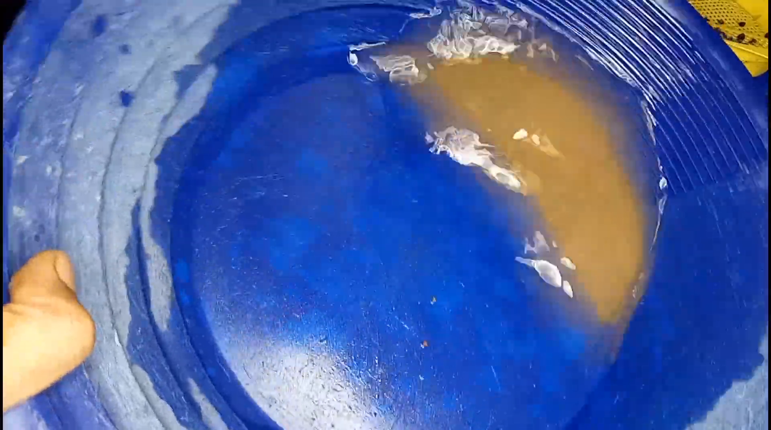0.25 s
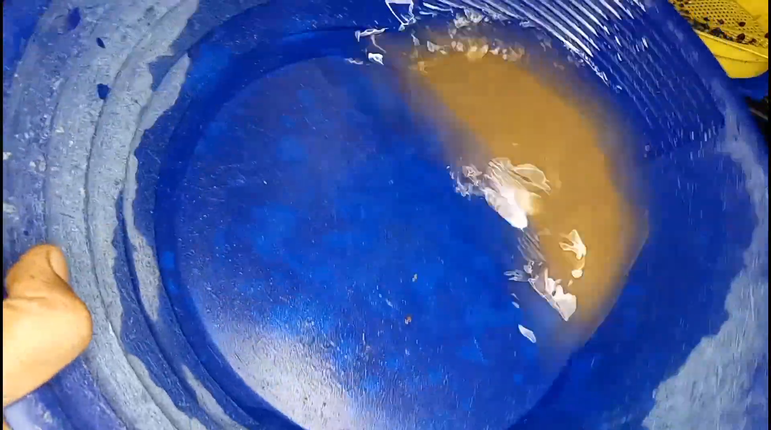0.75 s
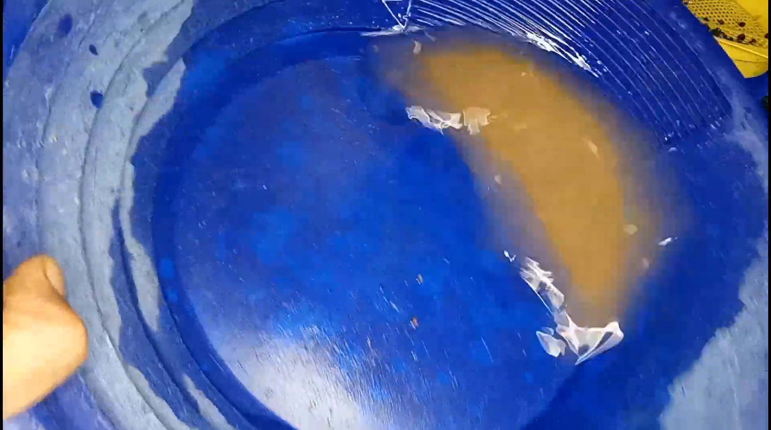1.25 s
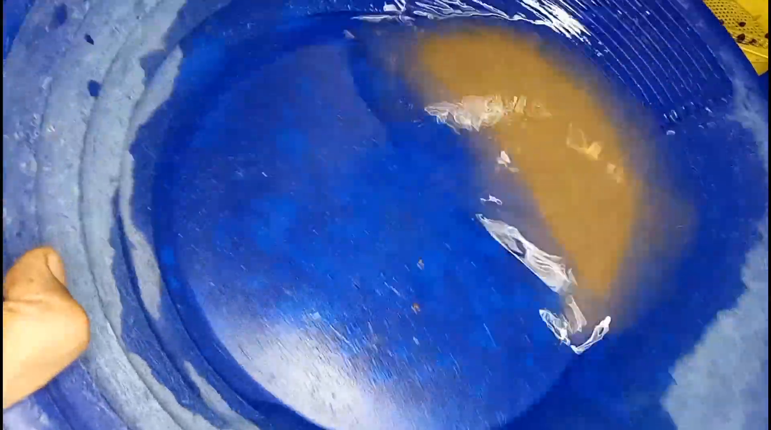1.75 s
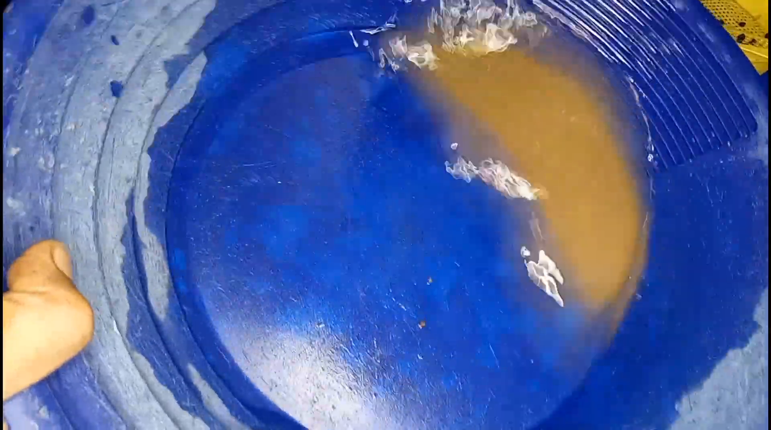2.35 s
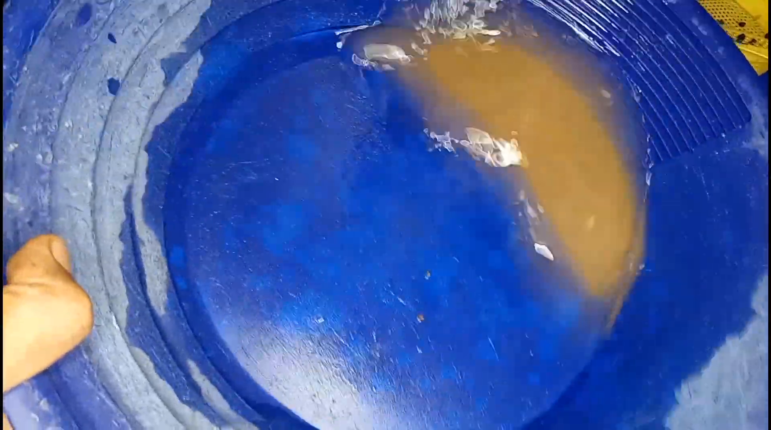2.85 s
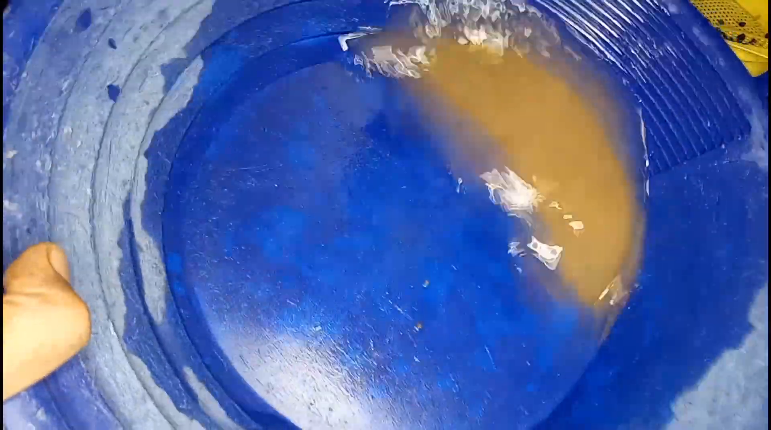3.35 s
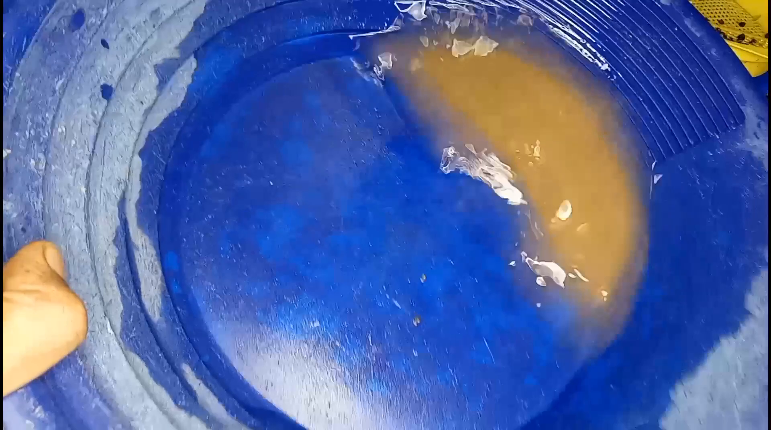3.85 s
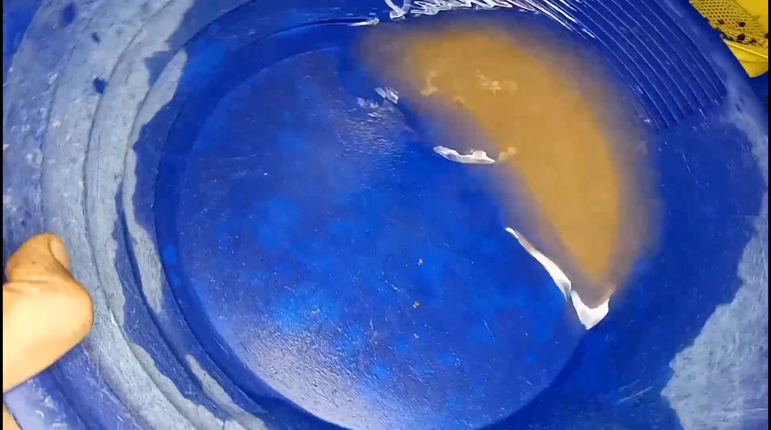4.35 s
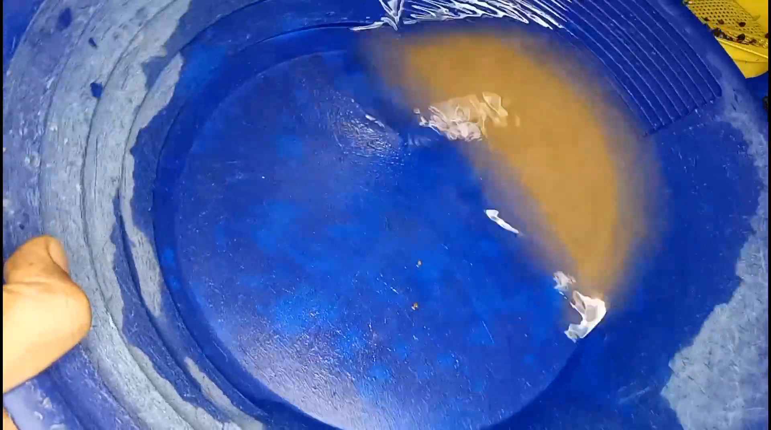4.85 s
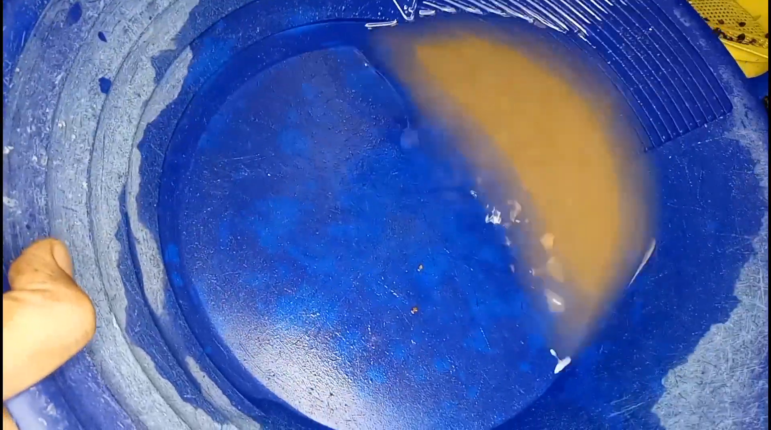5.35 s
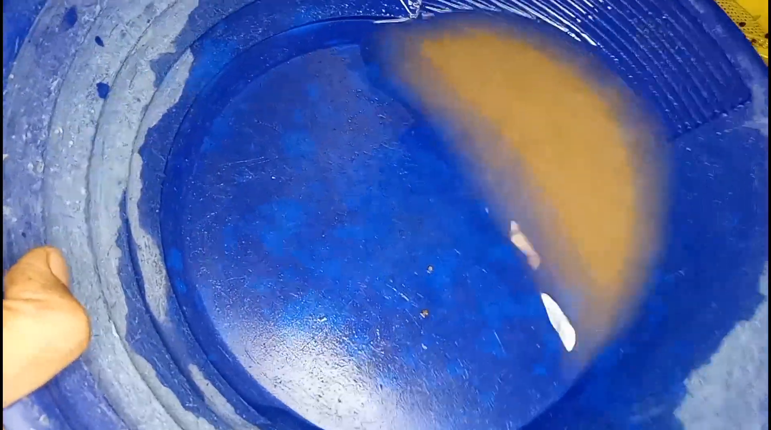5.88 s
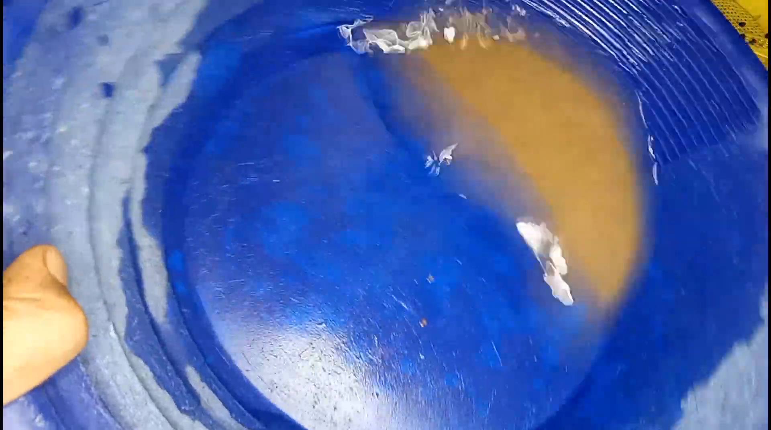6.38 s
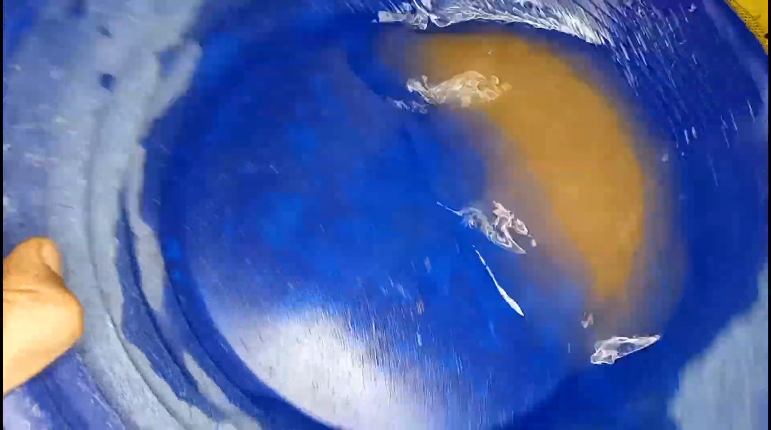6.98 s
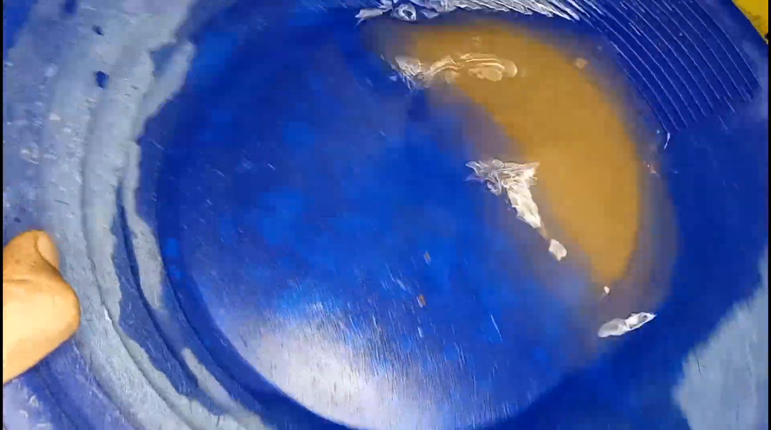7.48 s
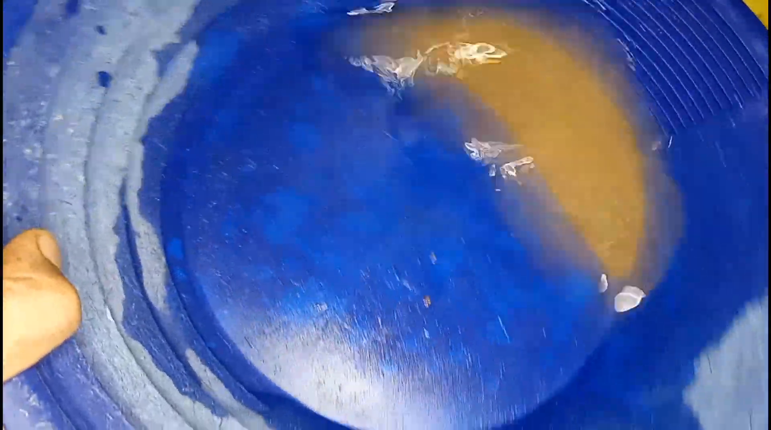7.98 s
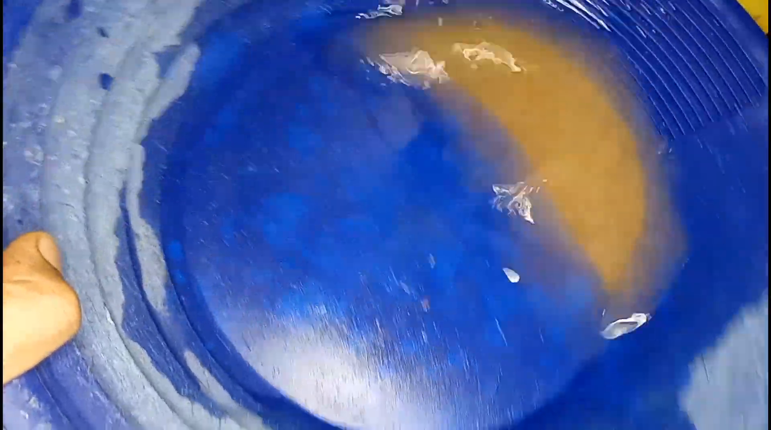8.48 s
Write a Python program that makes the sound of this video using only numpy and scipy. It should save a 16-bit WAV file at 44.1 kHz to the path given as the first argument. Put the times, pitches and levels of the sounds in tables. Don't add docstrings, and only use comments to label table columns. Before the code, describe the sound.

A plastic pan of water and sand is shaken by hand, very close. Hard grit cracks and wet slaps ring the wall dully, each with a dry tick, thin sizzle and short wash of sand. Activity is dense at first, eases after four seconds to light taps and tiny bubble pops, then returns strongly near seven seconds. Quiet small furnished room, faint mains hum, stereo phone microphone.

```python
import sys
import numpy as np
from scipy import signal
from scipy.fft import rfft, irfft
from scipy.io import wavfile
from scipy.ndimage import uniform_filter1d

SR = 44100
rng = np.random.default_rng(int(sys.argv[2]) if len(sys.argv) > 2 else 0)


def transcribe(u):
    v = np.clip(np.atleast_2d(u).T, -1, 1)
    q = np.round(v * 32767).astype(np.int16)
    wavfile.write(sys.argv[1], SR, q)


def volts(x):
    e = np.asarray(x, float) / 20
    return 10 ** e


N = 384552

# start in seconds, peak in dB, pitch in Hz, fade in seconds.
BUBBLES = [(5.476, -59, 2530, .035), (5.708, -51.5, 3900, .008), (5.77, -53.5, 3950, 0.026),
           (5.775, -53, 4850, 0.0098), (5.8371, -63, 1920, 0.027), (5.845, -66, 4600, 0.022),
           (5.998, -59, 4300, 0.019), (6.02, -62, 3750, .02), (6.035, -63.5, 3150, 0.014),
           (6.135, -53.5, 5440, 0.022), (4.7, -53, 4600, .02), (4.318, -53, 3900, 0.011),
           (8.322, -30.5, 7200, 0.0018), (6.298, -61, 4500, .015)]
# frequency in Hz, width in Hz, level in dB.
PAN_MODES = [(129, 14, -4), (204, 12.5, 5), (305, 5.3, -2), (383, 50, -2.5), (420, 160, -13.5),
             (590, 26.4, -1), (730, 19, -2.5), (897.2, 25.6, 6), (990, 101, -2.5), (1350, 73, 2),
             (1790, 100, -2), (2018, 52, -2.5)]
# frequency in Hz, width in Hz, level in dB.
TICK_MODES = [(2400, 1200, 4.5), (2857, 150, 2.5), (3305, 130, 7.5), (3945, 120, 4.5), (4375, 310, 5.5),
              (5530, 510, 4.5), (6660, 490, -8.5), (6760, 280, -10.5)]
# frequency in Hz, width in Hz, level in dB.
SIZZLE_MODES = [(6600, 1000, -3), (9700, 83, -17.5), (10430, 380, -11.5), (11500, 580, -14.5),
                (14840, 250, -14.5), (15100, 3000, -2)]
# frequency in Hz, level in dB.
HUM = [(60, -81.5), (120, -73.5), (360.7, -80.5), (538.3, -80), (662.1, -74.5), (780.6, -76.5),
       (839.8, -75)]
# frequency in Hz, density in dB per Hz.
AIR_COLOUR = [(25, -27), (60, -16), (130, -14), (175, -20.5), (427, -20), (796, -18.5), (3820, -35),
              (16000, -42)]
# time in seconds, left minus right in dB.
PAN_PLACE = [
    (0, -1),
    (4.35, -1),
    (4.55, -5),
    (5.4, -5),
    (5.6, -.8),
]
# start in seconds, peak in dB, loudest pan tone in Hz, tick in dB.
CRACKS = [(0.05, -28, 960, -40), (0.562, -16, 790, -13.5), (0.819, -25, 890, -35),
          (1.733, -25.5, 1020, -36), (1.863, -12, 684, -29), (2.22, -26.5, 1060, -26.5),
          (2.414, -15.5, 960, -22.5), (2.434, -19, 820, -37), (2.831, -15, 1270, -18.5),
          (2.909, -19, 1130, -19), (3.33, -8, 802, -10), (3.351, -14, 1080, -16.5), (3.452, -35, 910, -34),
          (3.651, -24.5, 580, -44), (3.678, -21.5, 1820, -28), (4.075, -34, 910, -35),
          (4.194, -39.5, 880, -35.5), (5.101, -27, 1860, -30.5), (6.924, -17, 460, -31),
          (6.937, -25, 270, -41), (7.176, -28.5, 1210, -31.5), (7.34, -16, 1110, -17),
          (7.409, -15, 970, -49), (7.551, -24, 730, -50), (7.801, -36, 800, -35.5), (7.94, -14, 694, -12),
          (8.027, -12.5, 1290, -21.5), (8.071, -36, 910, -31.5), (8.468, -11, 1190, -13),
          (8.713, -12.5, 960, -11.5)]
# start in seconds, peak in dB, loudest pan tone in Hz, tick in dB.
SLAPS = [(0.272, -17, 500, -42), (0.511, -13.5, 730, -29.5), (0.525, -19.5, 890, -58),
         (0.74, -20.5, 865, -36.5), (0.757, -15, 875, -29), (0.802, -22, 810, -37.5),
         (1.615, -27.5, 590, -46), (1.745, -25.5, 990, -38), (1.874, -12.5, 905, -21.5),
         (1.9, -14, 700, -25), (1.906, -23, 680, -27), (2.083, -19.5, 900, -34), (2.09, -11.5, 554, -29),
         (2.34, -10, 606, -20), (2.543, -31, 2080, -38.5), (2.734, -27, 2090, -41),
         (2.851, -12.5, 740, -22.5), (2.87, -23, 980, -54), (3.208, -20.5, 1055, -32),
         (5.137, -32.5, 1350, -38.5), (6.817, -22, 1047, -31.5), (6.95, -28, 786, -29),
         (7.11, -24, 990, -33), (7.121, -18, 1090, -36), (7.202, -14, 760, -22.5), (7.395, -19, 603, -30),
         (7.432, -13, 616, -35), (7.68, -15.5, 630, -34.5), (7.926, -17.5, 570, -52),
         (7.991, -24.5, 218, -39)]
# start in seconds, peak in dB, loudest pan tone in Hz, tick in dB.
SLOSHES = [(0.02, -44, 830, -58), (0.655, -25, 1250, -31), (0.834, -26.5, 890, -45), (0.895, -35, 820, -61),
           (1.479, -34, 1540, -46), (1.526, -47, 1100, -44), (1.89, -50, 730, -35.5),
           (2.007, -25, 1110, -39.5), (2.38, -25, 342, -36), (2.482, -23, 960, -39.5),
           (2.597, -33.5, 342, -50), (2.959, -28.5, 880, -47), (3.131, -35.5, 950, -36),
           (3.529, -31, 1430, -40), (3.638, -27, 406, -43), (3.663, -30.5, 302, -35.5),
           (3.797, -42, 920, -38), (3.808, -39, 940, -37), (3.906, -17.5, 684, -29),
           (4.761, -40.5, 2050, -49), (4.872, -46, 1340, -48.5), (5.072, -32, 1900, -50.5),
           (6.191, -42.5, 336, -94), (6.581, -38.5, 414, -47), (6.635, -45, 300, -54),
           (6.871, -55, 940, -39), (6.979, -22.5, 700, -36), (7.453, -31, 930, -29),
           (7.634, -31, 1350, -46.5), (7.735, -31.5, 930, -42)]
# start in seconds, peak in dB, loudest pan tone in Hz, tick in dB.
LAPS = [(0.063, -36, 1880, -27.5), (0.168, -33, 1410, -44), (0.327, -32.5, 710, -55),
        (0.431, -62, 1370, -46), (1.305, -47.5, 624, -62), (1.388, -38.5, 1830, -52.5),
        (1.673, -35, 590, -42.5), (2.619, -34.5, 380, -47), (2.644, -36, 360, -38.5),
        (3.027, -41, 1440, -43), (3.047, -48, 1410, -49), (3.256, -43, 1350, -43), (3.27, -30, 980, -52),
        (4.265, -42, 1750, -51), (4.63, -32.5, 1640, -48), (4.668, -42.5, 1370, -49),
        (4.836, -35.5, 1560, -44), (6.157, -48, 1300, -60.5), (6.323, -30.5, 1390, -52),
        (6.356, -44, 536, -49), (6.616, -32.5, 1410, -47), (6.652, -28, 1420, -41), (6.787, -30, 1360, -46),
        (8.232, -48, 410, -47), (8.324, -40, 1370, -37)]
# start in seconds, peak in dB, tick in dB.
TAPS = [(0.494, -41, -43), (0.996, -38.5, -48), (1.323, -41, -49), (1.512, -50, -38), (1.825, -33.5, -42),
        (2.263, -60, -69), (2.551, -34, -31.5), (2.8, -37, -45), (3.521, -33.5, -42.5),
        (3.54, -34.5, -41.5), (3.892, -35, -35.5), (4.279, -43, -48.5), (4.352, -40, -51),
        (4.445, -38, -54), (4.455, -36.5, -50), (4.62, -45, -47.5), (4.699, -44.5, -49), (4.903, -37, -51),
        (4.972, -39.5, -53), (5.581, -55, -61.5), (5.604, -49.5, -59.5), (6.458, -39.5, -54),
        (6.762, -37.5, -49), (6.999, -27.5, -68), (7.01, -22.5, -68), (7.03, -33, -50), (7.556, -39, -41.5),
        (8.182, -58, -43.5), (8.591, -34, -47.5), (8.68, -41, -35)]
# start in seconds, peak in dB.
SPRAYS = [(0.05, -18), (0.655, -25), (1.512, -25.5), (1.745, -19.5), (1.89, -26.5), (1.906, -17.5),
          (2.083, -15), (2.87, -20.5), (3.351, -16), (3.678, -24), (3.797, -19.5), (3.808, -26),
          (3.906, -19), (4.075, -18), (5.137, -29.5), (6.817, -18), (7.11, -18.5), (7.202, -22),
          (7.34, -18), (7.409, -10), (7.453, -18.5), (7.801, -21), (8.071, -21.5), (8.591, -23),
          (0.02, -30), (0.168, -30), (0.273, -32.5), (0.431, -33.5), (0.819, -29.5), (0.997, -27.5),
        (1.305, -33.5), (2.22, -27), (2.342, -32), (2.414, -28.5), (2.734, -36), (2.851, -28), (0.757, -34),
        (0.895, -45), (1.824, -33), (2.263, -35), (2.543, -33), (3.027, -41), (4.278, -40), (6.157, -42.5),
        (7.395, -32), (7.634, -40), (3.131, -32), (3.208, -28), (3.518, -31), (3.539, -31), (3.893, -46),
        (4.194, -38), (4.265, -31), (4.445, -31), (4.668, -28), (4.872, -34), (5.601, -38.5), (6.356, -35),
        (6.581, -31), (6.95, -28), (7.558, -30.5), (8.027, -24), (8.183, -32), (8.682, -27)]
# time in seconds, rolling sand in dB.
SHAKE = [(0.0, -33.5), (0.16, -64), (0.72, -41.5), (0.97, -77), (1.31, -65), (1.7, -46.5), (2.1, -51),
         (2.48, -49.5), (3.62, -53), (3.84, -49), (4.13, -55), (4.69, -74.5), (4.85, -56.5), (5.08, -57),
         (5.3, -66), (5.95, -85), (6.62, -46.5), (8.72, -52)]
# start in seconds, peak in dB, loudest pan tone in Hz, tick in dB.
RIPPLES = [(0.129, -38.5, 620, -48.5), (0.247, -33, 560, -53), (0.372, -43.5, 396, -79),
           (0.574, -22.5, 605, -43), (0.667, -47, 870, -54), (0.874, -42, 910, -89),
           (1.556, -36.5, 870, -52), (1.761, -50, 584, -57), (1.944, -31, 371, -61), (1.963, -37, 366, -58),
           (2.145, -53, 606, -42.5), (2.245, -34, 921, -60), (2.364, -22, 560, -39), (2.443, -23, 740, -36),
           (2.938, -26, 890, -59), (2.977, -33, 923, -47), (3.361, -32, 920, -29), (3.462, -29.5, 870, -46),
           (3.709, -38, 598, -63), (3.731, -43, 1370, -60), (3.941, -31, 595, -45), (3.98, -38, 306, -54),
           (4.056, -68, 937, -76), (4.088, -37.5, 896, -46), (4.392, -50, 1350, -62),
           (4.739, -40, 385, -54), (4.925, -45, 846, -72), (4.994, -46, 864, -50), (5.061, -43, 1050, -68),
           (5.144, -32, 1380, -50.5), (6.73, -50.5, 934, -73.5), (6.892, -32.5, 940, -48),
           (6.957, -28, 674, -52), (7.049, -32.5, 950, -53), (7.086, -30, 937, -47), (7.27, -77, 1170, -79),
           (7.271, -31.5, 930, -58), (7.31, -34, 918, -55), (7.379, -24.5, 1010, -44),
           (7.537, -35.5, 744, -63), (7.759, -32, 905, -69), (7.849, -39, 910, -73),
           (7.894, -30.5, 930, -62), (7.97, -35, 985, -61), (8.153, -61, 900, -72), (8.365, -44, 915, -58),
           (8.419, -40.5, 920, -43), (8.526, -36, 923, -59), (8.654, -37.5, 929, -47),
           (8.694, -32.5, 940, -42)]
# start in seconds, tick in dB, fizz in dB.
PRICKS = [(0.2144, -47, -48), (1.58, -36, -64), (2.043, -43, -46), (2.5217, -55, -61), (2.69, -47, -71),
          (2.7806, -71, -50), (3.073, -39, -54), (3.1717, -35, -63), (3.5923, -37.5, -72),
          (3.765, -55, -44.5), (3.8302, -29.5, -57), (4.6847, -49, -62), (6.531, -41.5, -81),
          (6.8844, -52, -62), (7.502, -35.5, -45), (7.5724, -56, -43), (7.649, -34, -69),
          (7.7004, -47, -47), (7.9086, -38, -54), (8.111, -59, -68), (8.5425, -60, -78), (8.578, -45, -66)]
# start in seconds, length in seconds, level in dB, pitch in Hz.
SLIDES = [(0.25, 0.066, -63, 4500), (3.362, 0.022, -56, 8800), (3.656, 0.035, -46, 6200),
          (3.793, 0.037, -52, 8500), (3.801, 0.088, -55.5, 6160), (3.898, 0.023, -45, 9350),
          (4.965, 0.05, -67, 4600), (4.485, 0.039, -66, 1900), (6.87, 0.054, -62, 3800),
          (3.797, 0.06, -54, 15400), (4.75, 0.028, -65, 2200), (8.26, 0.061, -60, 1120),
          (3.89, 0.036, -47, 14700), (8.497, 0.074, -61, 3350), (8.645, 0.056, -64, 6300)]
# start in seconds, peak in dB, loudest pan tone in
# Hz, tick in dB.
MORE_RIPPLES = [(0.003, -23.5, 900, -39), (0.433, -49.5, 1110, -51), (0.478, -44, 890, -58),
                (0.67, -30.5, 900, -50), (0.974, -52, 890, -63), (2.305, -34, 800, -58),
                (2.693, -38.5, 1820, -62), (3.188, -35, 900, -61), (4.002, -52.5, 900, -60),
                (5.213, -55, 1350, -52.5), (5.243, -47, 1430, -56), (5.509, -51.5, 950, -78),
                (6.444, -42, 930, -60.5), (7.26, -38, 930, -53.5), (8.062, -33, 920, -57),
                (8.115, -38, 1010, -55), (8.135, -38, 930, -74)]

PORTS = np.array([[1], [-1]])
ALIKE_HZ = 1280
WALL_HZ = 905
LEAD_S = .015
FLICKER_TOP = 1.1


def seconds(count):
    return np.arange(count) / SR


def unit(x):
    return x / np.sqrt(np.mean(x ** 2) + 1e-30)


def walk(rate):
    hold = int(SR / rate)
    steps = np.repeat(rng.standard_normal(N // hold + 1), hold)
    return 5.0 * uniform_filter1d(steps, hold)[:N]


def air():
    hz = np.arange(N // 2 + 1) * SR / N + 1
    colour_hz, colour_db = np.transpose(AIR_COLOUR)
    colour = volts(np.interp(np.log(hz), np.log(colour_hz), colour_db))
    mid, side = rfft(rng.standard_normal((2, N))) * colour
    noise = irfft(mid + np.clip(hz / ALIKE_HZ + 0.26, 0, 1) * side * PORTS, N)
    hum = 0
    for f, db in HUM:
        level = volts(db - 2.5 + 0.49 * walk(0.53))
        hum = hum + level * np.sin(2 * np.pi * (f * seconds(N) + rng.random()))
    return volts(-72.5) * unit(noise) + hum


def ring(modes, scatter_db, damp, lean_db=0):
    hz, width, db = np.transpose(modes)
    chance = rng.standard_normal((3, len(hz)))
    t = seconds(min(1700, int(2 * SR / width.min() / damp)))[:, None]
    pitch = hz * (1 + 0.028 * np.minimum(2000 / hz, 1) * chance[0])
    tones = np.exp(np.pi * t * (2j * pitch - damp * width))
    apart = np.clip(hz / ALIKE_HZ, .1, 1.3) ** 1.71 * chance[2] * PORTS / 2
    strength = volts(db + lean_db + scatter_db * chance[1]) * width * np.sign(chance[0] * chance[2])
    return ((strength * np.exp(1j * apart)) @ tones.T).imag


def strike(modes, scatter_db, lean_db, rise_s, wash_db, wash_s):
    quench_s, quench_db = 0.0068, -10.5
    t = seconds(4600) - LEAD_S
    noise = rng.standard_normal((3, len(t)))
    after = np.maximum(t, 0)
    soft = min(rise_s / 0.0014, 1)
    push = noise[0] * after / rise_s * np.exp(1 - after / rise_s)
    push[int((LEAD_S + rise_s) * SR)] += 22 * (1 - soft)
    lumps = volts(2.4 * uniform_filter1d(noise[2], size=110) * np.sqrt(110))
    gather = 0.28 * soft * np.exp(t / 0.0097)
    wash = noise[1] * lumps * np.where(t < 0, gather, np.exp(-t / wash_s))

    struck = ring(modes, scatter_db * soft, 1.47 + 0.67 * (1 - soft), lean_db)
    blow = signal.fftconvolve(struck, push[None], axes=1)[:, :len(t)]
    blow = blow * (volts(quench_db) + np.exp(-np.maximum(t - 2 * rise_s, 0) / quench_s))
    brushed = ring(modes, 4.9, 1.3, .5 * lean_db)
    sweep = signal.fftconvolve(brushed, wash[None], axes=1)[:, :len(t)]
    return blow / np.abs(blow).max() + volts(wash_db + 0.85) * soft * unit(sweep)


def knocks():
    wash_slope = 0.25
    stray_db = -22.5
    out = np.zeros((2, N + 9000))
    pan_hz = np.transpose(PAN_MODES)[0]
    narrow = np.transpose(SIZZLE_MODES)[1] < 400
    taps = [(s, db, WALL_HZ, tick_db) for s, db, tick_db in TAPS]
    pricks = [(s, tick_db - 3, WALL_HZ, tick_db) for s, tick_db, _ in PRICKS]
    kinds = [(CRACKS, 1.05), (SLAPS, 2.9), (SLOSHES, 7.3), (LAPS, 2.6), (taps, 3.5),
             (RIPPLES, 5.0), (pricks, 1.1), (MORE_RIPPLES, 5.0)]
    prick_fizz = [(s, fizz_db + 14) for s, _, fizz_db in PRICKS]
    spray_s, spray_db = np.transpose(SPRAYS + prick_fizz)
    for s, db, hz, tick_db, contact_ms in [(*row, ms) for rows, ms in kinds for row in rows]:
        nearby = abs(spray_s - s) < .0045
        sizzle_db = np.max(spray_db[nearby], initial=tick_db + stray_db)
        octave = np.log(pan_hz / hz)
        lean_db = 11.7 * np.exp(-(octave / 0.26) ** 2) - 14.0 * np.maximum(octave, 0)
        wake_db = 0.23 * max(sizzle_db + 62, 0) * narrow
        rise_s = .00035 + .0003 * contact_ms
        body_wash_db = -22.5 - wash_slope * (db + 27)
        tick_wash_db = -22.5 - wash_slope * (tick_db + 43.0)
        x = volts(db - 3.57) * strike(PAN_MODES, 6.53, lean_db, rise_s, body_wash_db, 0.015)
        x = x + volts(tick_db + 0.15) * strike(TICK_MODES, 2.56, 0, rise_s, tick_wash_db, 0.022)
        sizzle = strike(SIZZLE_MODES, 2.1, wake_db, rise_s + 0.00038, -28.0, 0.027)
        x = x + volts(sizzle_db - 10.0) * sizzle
        side_db = rng.standard_normal()
        i = max(int((s - .0008 - rise_s) * SR), 0)
        out[:, i:i + x.shape[1]] += volts(side_db * PORTS / 2) * x
    return out[:, int(LEAD_S * SR):][:, :N]


def grains(modes, rate, spread_db, flicker_db):
    size = volts(spread_db * np.minimum(rng.exponential(size=N), 2.6))
    hit = (rng.random(N) < rate / SR) * size
    push = signal.lfilter([1], [1, -.97], hit)
    out = 0
    for hz, width, db in modes:
        flicker = volts(flicker_db * np.minimum(walk(25), FLICKER_TOP))
        mid, side = push * flicker * rng.standard_normal((2, N))
        pair = mid + min(hz / ALIKE_HZ, 1) ** 1.5 * side * PORTS
        mode = signal.lfilter(*signal.iirpeak(hz, hz / width, SR), pair)
        out = out + volts(db) / np.sqrt(width) * mode
    return unit(out)


def gurgle(count, low_hz, octaves):
    out = np.zeros((2, N + 2000))
    t = seconds(1100)
    for when, pitch, size, side in rng.random((count, 4)):
        hz = low_hz * 2 ** (octaves * pitch)
        fade = np.exp(-t * hz / 7.1) * np.minimum(t * hz, 1)
        lag = PORTS * (side - .5) * hz / 700
        i = int(when * N)
        tone = np.sin(2 * np.pi * hz * t * (1 + 0.002 * hz * t) + lag)
        out[:, i:i + len(t)] += volts(17.0 * size) * fade * tone
    return unit(out[:, :N])


def sand(blows):
    stir_s, stir_share = 0.028, 0.3
    keep = np.exp(-1 / (stir_s * SR))
    stir = signal.lfilter([1 - keep], [1, -keep], np.abs(blows).mean(axis=0)) + volts(-67.5)
    surge_db = stir_share * 20 * np.log10(stir / uniform_filter1d(stir, size=SR // 2))
    roll_db = np.interp(seconds(N), *np.transpose(SHAKE))
    grit_db = -76 + 0.52 * (roll_db + 50.0) + 0.5 * surge_db
    rolling = grains(PAN_MODES, 2400, 3.8, 3.25)
    rolling = rolling + volts(-18.0) * gurgle(count=1300, low_hz=288.0, octaves=2.4)
    grit = grains(TICK_MODES, 2000, 3.7, 2.1) + volts(-7.0) * grains(SIZZLE_MODES, 2500, 9.6, 3.9)
    out = volts(roll_db + surge_db - 3.0) * rolling + volts(grit_db + 7.0) * grit
    return volts(1.35 * np.minimum(walk(30), 2 * FLICKER_TOP)) * out


def rumble(blows):
    force = np.abs(uniform_filter1d(np.abs(blows).mean(axis=0), size=3000)) ** 0.72
    low_band = signal.butter(2, (75, 155), "band", fs=SR, output="sos")
    mid, side = signal.sosfilt(low_band, rng.standard_normal((2, N)))
    return volts(-36) * force * unit(mid + 0.26 * side * PORTS)


def room(x):
    t60_s, level_db = 0.12, -21
    t = seconds(16000)
    tail = rng.standard_normal((2, len(t))) * np.exp(-np.log(1000) * t / t60_s) * (t > .004)
    tail = signal.lfilter([1], [1, -.3], tail)
    return volts(level_db) * signal.fftconvolve(x, unit(tail) / np.sqrt(len(t)), axes=1)[:, :N]


def slides():
    out = np.zeros((2, N + 9000))
    t = seconds(9000)
    for s, length, db, hz in SLIDES:
        noise = rng.standard_normal((3, len(t)))
        hiss = signal.lfilter(*signal.iirpeak(hz, 17 * hz / 5000, SR), noise[:2])
        lumps = volts(3.5 * unit(uniform_filter1d(noise[2], size=150)))
        shape = np.minimum(t / 0.0066, 1) * np.exp(-(t / length) ** 2)
        i = int(s * SR)
        out[:, i:i + len(t)] += volts(db + 3.5) * shape * lumps * unit(hiss)
    return out[:, :N]


def bubbles():
    out = np.zeros((2, N))
    t = seconds(4000)
    for s, db, hz, fade_s in BUBBLES:
        rough = unit(uniform_filter1d(rng.standard_normal((2, 2, len(t))), size=110))
        phase = 2 * np.pi * hz * t * (1 - 0.5 * t)
        tone = (0.27 + rough[0]) * np.sin(phase) + rough[1] * np.cos(phase)
        shape = np.minimum(t / 0.0015, 1) * np.exp(-t / fade_s)
        i = int(s * SR)
        out[:, i:i + len(t)] += volts(db - 6.0) * tone * shape
    return out


def scene():
    dip_hz, dip_width_hz = 168.7, 89
    blows = knocks()
    pan = blows + sand(blows) + bubbles() + slides()
    pan = signal.sosfilt(signal.butter(4, 134, "high", fs=SR, output="sos"), pan)
    pan = signal.lfilter(*signal.iirnotch(dip_hz, dip_hz / dip_width_hz, SR), pan)
    lean_db = np.interp(seconds(N), *np.transpose(PAN_PLACE))
    return pan * volts(lean_db * PORTS / 2) + room(pan) + air() + rumble(blows)


def gate(x):
    low_hz, high_hz, top_hz = 6930, 13900, 15600
    hz, _, z = signal.stft(x, SR, nperseg=1024)
    frame = np.sqrt(np.sum(np.abs(z) ** 2, axis=(0, 1)))
    band = (hz / 350).astype(int)
    chance = uniform_filter1d(rng.standard_normal((band.max() + 1, len(frame))), size=4) * 2
    hz = hz[:, None]
    step_db = -42 + 8 * chance[band]
    step_db = step_db - 20.0 * np.clip((hz - high_hz) / 700, 0, 1) * (hz < top_hz)
    step_db = step_db + 27 * (hz > top_hz)
    step_db = step_db - 20.0 * np.clip(1 + (low_hz - hz) / 900, 0, 1)
    calm = np.minimum(np.roll(frame, 1) / (frame + 1e-12), 1) ** 1.1
    limit = volts(step_db) * frame * calm + volts(-116)
    leak = .015 * (hz < high_hz)
    keep = leak + 1 / (1 + (limit / (np.abs(z) + 1e-15)) ** 8)
    return signal.istft(z * np.where(hz > 6300, keep, 1), SR, nperseg=1024)[1][:, :N]


def band_limit(x):
    return signal.sosfilt(signal.butter(12, 16790, fs=SR, output="sos"), x)


def record(dry):
    x = signal.sosfilt(signal.ellip(6, .5, 38, 16500, fs=SR, output="sos"), dry)
    mix = gate(x)
    return band_limit(mix)


dry = scene()
out = record(dry)
transcribe(out)
```